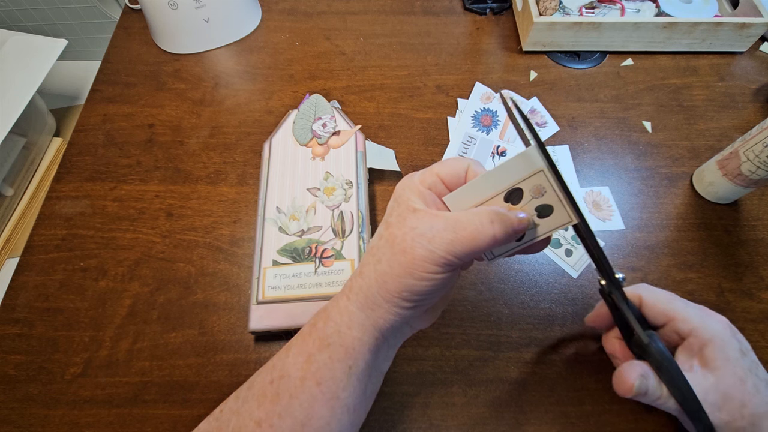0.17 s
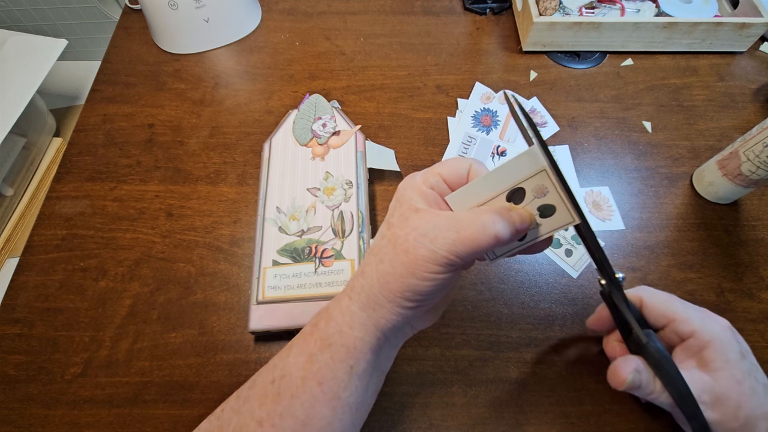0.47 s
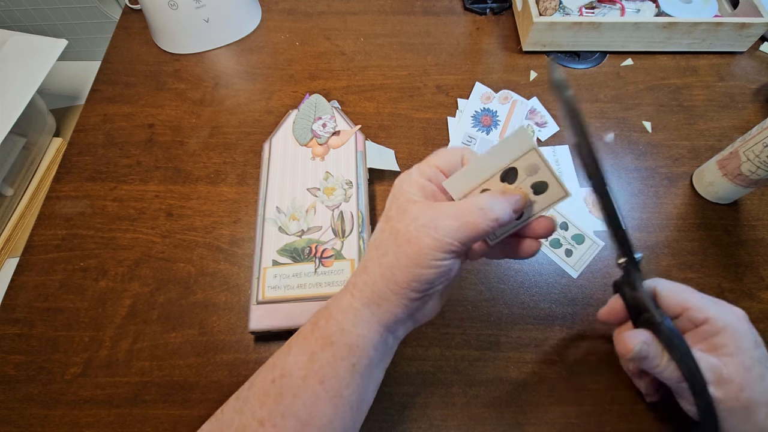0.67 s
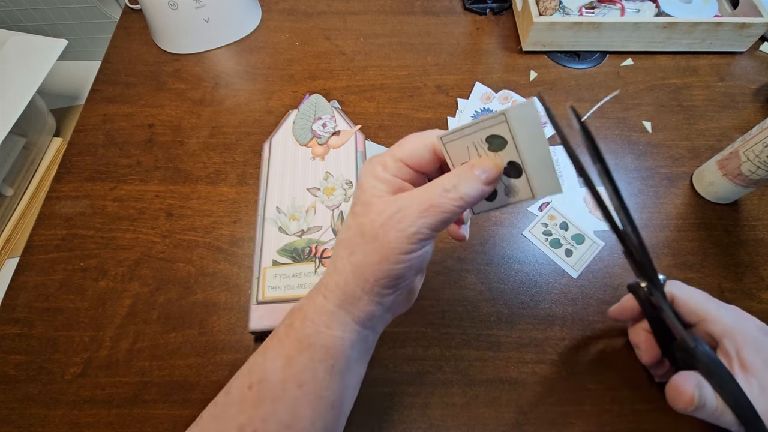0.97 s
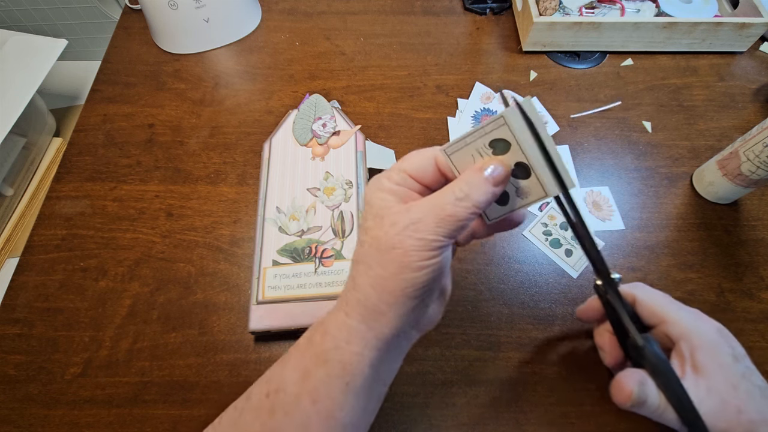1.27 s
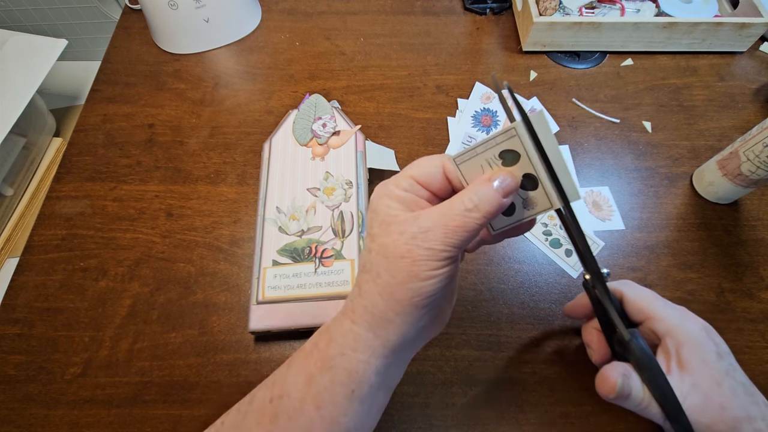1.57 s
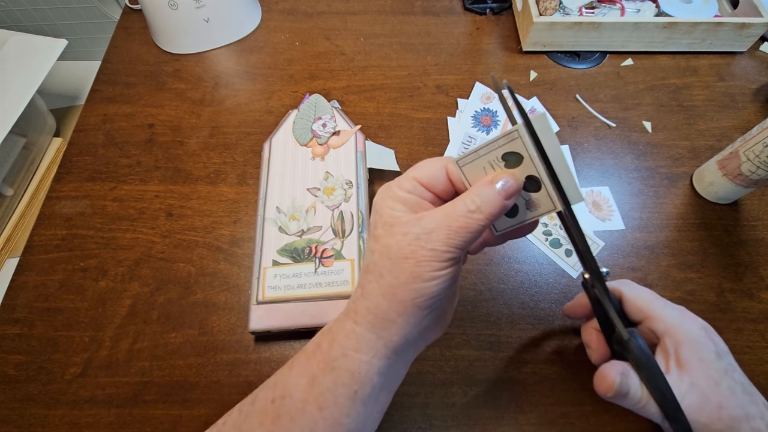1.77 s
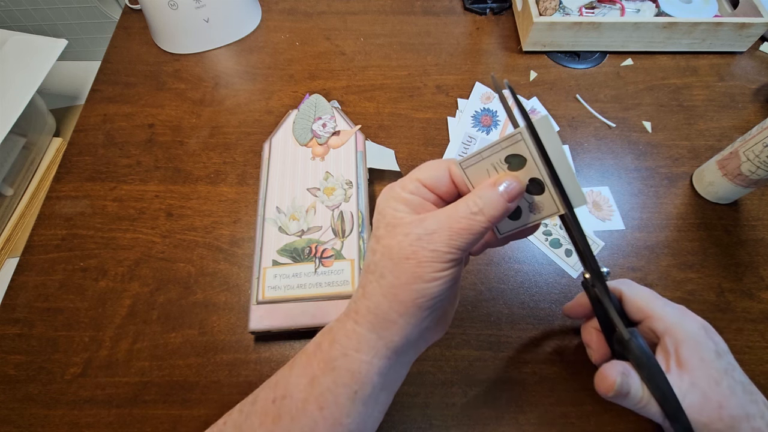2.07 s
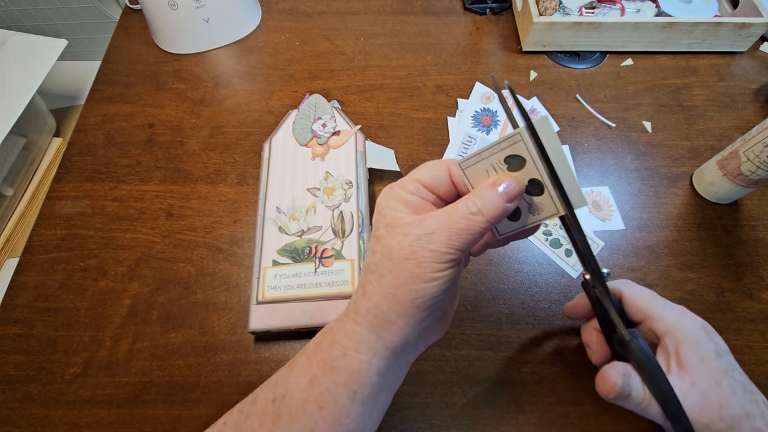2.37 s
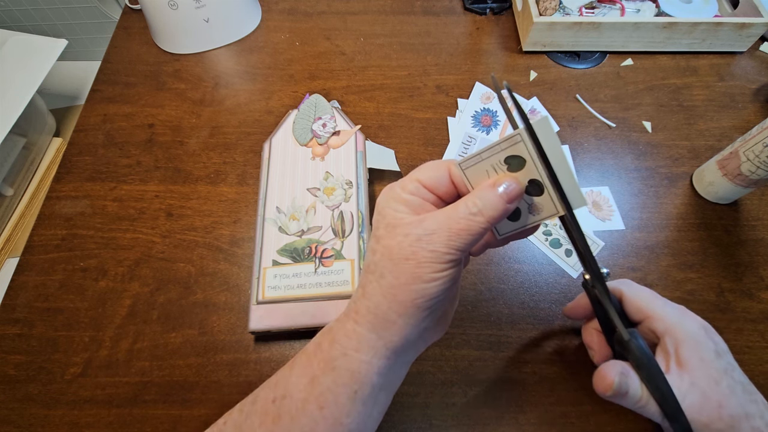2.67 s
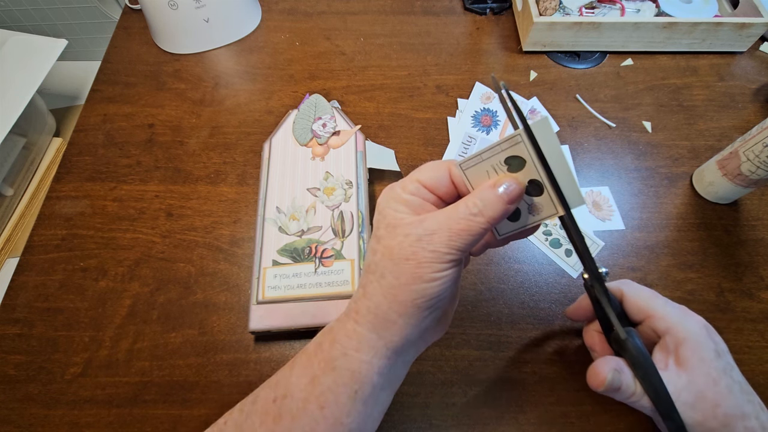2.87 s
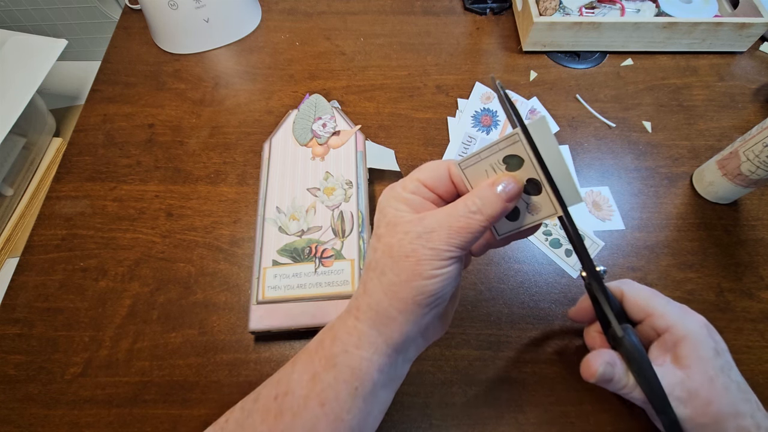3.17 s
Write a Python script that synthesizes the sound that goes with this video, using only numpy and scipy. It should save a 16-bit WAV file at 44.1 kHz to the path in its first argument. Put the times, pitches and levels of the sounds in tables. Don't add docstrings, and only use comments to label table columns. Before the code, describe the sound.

Close stereo pickup of scissors at an indoor desk: crisp tearing cut ending in a snap, steel sliding open, faint ticks and distant thuds, then another finer cut over low building rumble.

```python
import sys
import numpy as np
from scipy import signal
from scipy.fft import rfft, irfft, next_fast_len
from scipy.io import wavfile
from scipy.ndimage import uniform_filter1d

SR = 44100
rng = np.random.default_rng(int(sys.argv[2]) if len(sys.argv) > 2 else 0)


def wav_record(signal):
    frames = np.transpose(np.atleast_2d(signal))
    bounded = np.clip(frames, -1, 1)
    quanta = np.round(bounded * 32767).astype(np.int16)
    wavfile.write(sys.argv[1], SR, quanta)


def ratio(d):
    e = np.asarray(d, float) / 20
    return 10 ** e


N = 145530
TIME = np.arange(N) / SR
TO_LEFT = np.array([[1], [-1]])


def rms_one(x):
    return x / np.sqrt(np.mean(x ** 2) + 1e-30)


def at_hz(points, hz, fall_db=0):
    octave, db = np.log2(np.array(points)[:, 0]), np.array(points)[:, 1]
    h = np.log2(np.maximum(hz, 1))
    outside = np.maximum(octave[0] - h, 0) + np.maximum(h - octave[-1], 0)
    return np.interp(h, octave, db) - fall_db * outside


def colour(pair, spectrum, side, fall_db=12):
    size = next_fast_len(pair.shape[1] + 8192)
    size += size % 2
    hz = np.fft.rfftfreq(size, 1 / SR)
    db = at_hz(spectrum, hz, fall_db)
    db = np.array([db, db + at_hz(side, hz)]) - db.max()
    cepstrum = irfft(np.maximum(db, -140) * np.log(10) / 20, size)
    cepstrum[:, 1:size // 2] *= 2
    cepstrum[:, size // 2 + 1:] = 0
    gain = np.exp(rfft(cepstrum)) / np.sqrt(np.mean(ratio(2 * db[0])))
    mid, diff = irfft(rfft(pair, size) * gain, size)[:, :pair.shape[1]]
    return np.array([mid + diff, mid - diff])


def resonate(x, hz, width_hz):
    r = np.exp(-np.pi * width_hz / SR)
    poles = [1, -2 * r * np.cos(2 * np.pi * hz / SR), r * r]
    return signal.lfilter([1, 0, -1], poles, x + 1e-18) * np.sqrt((1 - r * r) / 2)


def resonate_twice(x, hz, width_hz):
    return resonate(resonate(x, hz, width_hz), hz, width_hz)


def ring(s, hz, db, t60):
    out, i = np.zeros(N), int(s * SR) + 1
    t = np.arange(i, min(N, i + int(2 * t60 * SR))) / SR - s
    out[i:i + len(t)] = ratio(db - 60 * t / t60) * np.sin(2 * np.pi * hz * t)
    return out


def drift(rate_hz):
    r = np.exp(-2 * np.pi * rate_hz / SR)
    return rms_one(signal.lfilter([1], [1, -2 * r, r * r], rng.standard_normal(N + SR))[SR:])


def curve(rows):
    return ratio(np.interp(TIME, *np.transpose(rows)))


# t/s, level/dB
RUMBLE_SWELL = [(0.0, -55), (0.14, -40.5), (0.33, -53), (0.47, -45.5), (0.8, -47), (0.82, -41.5),
                (1.0, -47.5), (1.39, -47), (1.41, -39.5), (1.45, -53), (1.56, -41), (1.6, -51.5),
                (1.7, -39.5), (1.74, -45.5), (2.73, -41.5), (2.76, -58.5), (2.81, -46), (3.3, -47.5)]
# f/Hz, level/dB per Hz
RUMBLE_COLOUR = [(12, -17.5), (30, -5.5), (60, 6), (79, -5), (92, -25.5)]
# f/Hz, level/dB per Hz
AIR_COLOUR = [(92, -13), (179, -14.5), (202, -18), (420, -31), (520, -37.5), (1400, -43), (2000, -50),
              (9000, -68.5)]
# f/Hz, side against mid/dB
AIR_SIDE = [(60, -28), (180, -13), (550, 0.5), (15000, 2)]
# f/Hz, level/dB, width/Hz
HUM = [(119.4, -61.5, 15), (176.33, -64.5, 12), (4430, -99, 140), (8670, -108, 200)]
# f/Hz, level/dB
TONES = [(176.5, -64), (2160, -81.5), (4323, -100)]


def background():
    noise = rng.standard_normal((2, 2, N + SR))
    rumble = rms_one(colour(noise[0], RUMBLE_COLOUR, AIR_SIDE, fall_db=32.5)[:, SR:])
    level = np.sqrt(uniform_filter1d(rumble.mean(0) ** 2, SR // 8) + 0.071)
    rumble = rumble / level * curve(RUMBLE_SWELL)
    air = rms_one(colour(noise[1], AIR_COLOUR, AIR_SIDE, fall_db=36.5)[:, SR:])
    air = air * ratio(-62 + 1.5 * drift(2.6))
    hum = 0
    for hz, db, width in HUM:
        mid, side = resonate_twice(rng.standard_normal((2, N + SR)), hz, width)[:, SR:]
        side = ratio(at_hz(AIR_SIDE, hz)) * rms_one(side)
        hum = hum + ratio(db) * (rms_one(mid) + side * [[1], [-1]])
    whine = sum(ratio(db) * np.sin(2 * np.pi * hz * TIME) for hz, db in TONES)
    return rumble + air + hum + whine


# from t/s, to t/s, level/dB
DRAG = [
    (0, 0.386, -84.5),
    (0.409, 0.593, -69.5),
    (.6, 0.654, -69),
    (2.82, 3.312, -75.5),
]
# f/Hz, level/dB per Hz
TEAR_NEXT = [(530, -34.5), (900, -4.5), (3490, -13), (4230, -6), (4940, -9), (9900, -5.5), (15800, -13.5)]
# f/Hz, side against mid/dB
SLIDE_SIDE = [(950, -10), (3800, -0.5)]


def drag():
    edge_s = 0.018
    on = 0
    for start, end, db in DRAG:
        inside = np.minimum(TIME - start, end - TIME)
        on = on + ratio(db) * np.clip(inside / edge_s + 1, 0, 1) ** 2
    rough = rng.standard_normal((2, N)) * ratio(4.6 * drift(42))
    return colour(rough, TEAR_NEXT, SLIDE_SIDE) * on


SLIP_SAMPLES = 4096


def slip_swell(ms):
    rise_share, fade_share = 0.7, 0.45
    u = np.arange(SLIP_SAMPLES) / SR / (ms / 1000 + 1e-4)
    rise = np.sin(np.pi / 2 * np.clip(u / rise_share, 0, 1)) ** 2
    return rise * np.exp(-np.maximum(u - rise_share, 0) ** 1.29 / fade_share)


def fibre_breaks():
    breaks_per_s, spread_db = 14000, 2
    shape = (2, SLIP_SAMPLES)
    sizes = ratio(spread_db * np.minimum(rng.exponential(1, shape), 4)) * rng.choice([-1, 1], shape)
    return rms_one(sizes * (rng.random(shape) < breaks_per_s / SR))


def blade_ring(breaks, blades):
    luck_db = 5 * rng.normal(0, 1, len(blades))
    modes = [ratio(db + luck) * resonate(breaks, hz, width) for (hz, width, db), luck in zip(blades, luck_db)]
    return sum(modes) / 3


# f/Hz, width/Hz, level/dB
STEEL = [(1590, 25, -10.5), (2064, 60, -1), (2437, 30, -9), (2920, 59, -5), (3506, 64, -5.5),
         (4345, 420, 2.5), (4830, 180, -3.5), (5386, 46, -8), (7366, 160, -6.5), (7790, 149.7, -3.5),
         (8600, 120, 3.5), (11560, 400, -9.5)]
# f/Hz, side against mid/dB
NEAR_SIDE = [(200, -10), (600, -9.5), (2000, -8.5), (9000, 1.5)]


def slips(rows, spectrum, flaps_db, blades=STEEL, blades_db=-8.5):
    slip_db, patch_db = -10, 2.5
    flap_hz, flap_width_hz = 366, 67
    out = np.zeros((2, N + SLIP_SAMPLES))
    for (s, db, card_hz, card_db, ms), flap_db in zip(rows, np.broadcast_to(flaps_db, len(rows))):
        swell = slip_swell(ms)
        breaks = fibre_breaks() * swell
        tearing = breaks + ratio(blades_db) * blade_ring(breaks, blades)
        patchy = [(hz, at_hz(spectrum, hz, 10) + patch_db * rng.normal())
                  for hz in np.geomspace(250, 16000, num=16)]
        bright = 1.605 * rms_one(colour(tearing, patchy, NEAR_SIDE))
        card = ratio(card_db) * rms_one(resonate(breaks[0], card_hz, 28 + card_hz / 12))
        flap = ratio(flap_db) * rms_one(resonate(breaks[0], flap_hz, flap_width_hz))
        i = max(int((s - 0.2 * ms / 1000) * SR), 0)
        out[:, i:i + SLIP_SAMPLES] += ratio(db + slip_db) * (bright + card + flap) * swell.std()
    return out[:, :N] * ratio(TO_LEFT)


# t/s, peak level/dB, card f/Hz, card ring level/dB, length/ms
SLIPS = [
    (0.0034, -52.5, 576, -5.5, 8.1),
    (0.0129, -52.5, 397, 2.5, 13.4),
    (0.072, -42, 1020, -5, 10),
    (.092, -65, 1020, -6, 7.1),
    (0.1345, -51, 4400, -12, 5.5),
    (0.1515, -45.5, 990, -21, 12),
    (0.2255, -40, 1114, -5, 10.4),
    (.243, -60.5, 693, 17.5, 8),
    (0.2558, -42.5, 1290, -17.5, 8),
    (0.2885, -38, 1140, -11.5, 8.4),
]
# f/Hz, level/dB per Hz
TEAR = [(290, -33), (500, -2), (3270, -13), (4300, -7), (8370, -6.5), (10200, -11), (15800, -11.5)]


def first_cut():
    return slips(SLIPS, TEAR, flaps_db=-3.5)


# t/s, peak level/dB, card f/Hz, card ring level/dB, length/ms
HARD_SLIPS = [(.409, -42.5, 377, 3.5, 4.6), (.418, -43.5, 386, -0.5, 7), (.435, -53.5, 1130, 4.5, 6.1),
              (.458, -40, 716, 0.5, 9.1), (.491, -39, 774, 4.5, 15), (.525, -35, 1027, 3.5, 12.2),
              (.545, -33.5, 1590, -6, 14.4), (.565, -36, 2010, -14, 8.8), (.5812, -25, 4730, -7, 3.98),
              (.5855, -30.5, 980, -4, 5.3), (.594, -34.5, 2900, -10, 12)]
# f/Hz, level/dB per Hz
TEAR_HARD = [(240, -40), (400, -8.5), (991, -15.5), (1330, -18), (4910, -18), (10100, -23.5),
             (15800, -20.5)]


def hard_cut():
    return slips(HARD_SLIPS, TEAR_HARD, flaps_db=-9.5)


# f/Hz, level/dB, t60/s
CRACK = [(854, -42, .05), (1020, -38.5, 0.085), (2020, -42, .03), (2840, -36, .015), (4400, -31, 0.0096),
         (5000, -35, .012)]


def snap_shut():
    tips = sum(ring(0.5818, *mode) for mode in CRACK)
    handles = ring(0.582, 227.7, -37, 0.051)
    return tips + handles


# t/s, level/dB
SLIDE = [
    (.69, -77),
    (.705, -56),
    (.735, -60),
    (.79, -50.5),
    (.83, -52.5),
    (.885, -67.5),
    (.93, -52),
    (1.0, -69.5),
    (1.055, -76.5),
]
# f/Hz, level/dB per Hz
SLIDE_COLOUR = [(710, -20.5), (1200, -7), (1570, -13.5), (2150, -4), (2550, -5), (7270, -2), (15800, -4.5)]


def slide():
    rub = rng.standard_normal((2, N)) * ratio(2 * drift(140))
    on = (TIME > SLIDE[0][0]) * ratio(-500 * np.maximum(TIME - SLIDE[-1][0], 0))
    hiss = colour(rub, SLIDE_COLOUR, SLIDE_SIDE, fall_db=-5)
    return hiss * curve(SLIDE) * on * ratio(TO_LEFT)


# t/s, peak level/dB, card f/Hz, card ring level/dB, length/ms
CLICKS = [
    (.740, -42, 6130, 0.5, 14.6),
    (.752, -63, 760, -2, 9),
    (.807, -38.5, 1090, -10.5, 13),
    (.851, -35, 2980, -5.5, 9),
    (.862, -56.5, 790, 10.5, 5.3),
    (.945, -49, 950, -3, 8.9),
]
# f/Hz, level/dB per Hz
CLICK = [(500, -2.5), (1300, -12.5), (3000, -12), (9800, -14), (15800, -9.5)]


def clicks():
    return slips(CLICKS, CLICK, flaps_db=-12)


# f/Hz, level/dB, t60/s
BUMP = [(104.7, -27.5, 0.12), (172.2, -33.5, 0.21), (274, -43.5, 0.11), (369, -52.5, 0.2),
        (520, -47.5, 0.096), (646, -53.5, 0.13)]


def desk_bump():
    start_s, rise_s = 0.806, 0.006
    rise = np.clip((TIME - start_s) / rise_s, 0, 1)
    modes = sum((-1) ** k * ring(start_s, *mode) for k, mode in enumerate(BUMP))
    return -rise * modes


# t/s, peak level/dB, f/Hz, rise/ms
TICKS = [
    (1.033, -77.5, 8370, 10.5),
    (1.14, -89.5, 8660, 24),
    (1.239, -90.5, 8600, 8.8),
    (1.647, -80.5, 3110, 2.95),
    (1.68, -88, 3200, 3.6),
    (1.735, -89, 3210, 16),
    (1.772, -74.5, 14000, 3.6),
    (2.026, -85.5, 4170, 3),
    (2.68, -74.5, 12900, 3),
    (2.689, -68, 14300, 3),
]


def ticks():
    out = 0
    for s, db, hz, ms in TICKS:
        u = np.maximum(TIME - s, 0) / (ms / 1000)
        rustle = resonate_twice(rng.standard_normal((2, N)), hz, 0.45 * hz)
        out = out + ratio(db) * rustle * u * np.exp(1 - u)
    return out


# t/s, f/Hz, level/dB
THUDS = [
    (1.152, 50, -34),
    (1.398, 55, -37),
    (1.691, 55, -41.5),
]


def floor_thuds():
    return -sum(ring(s, hz, db, 0.099) for s, hz, db in THUDS)


# t/s, peak level/dB, card f/Hz, strip flap level/dB, length/ms
NEXT_SLIPS = [(2.782, -64.5, 3400, -12, 4.6), (2.802, -55, 3030, -6, 3.4), (2.8278, -50, 2930, -6.5, 8),
              (2.850, -56, 2980, 2, 4.5), (2.859, -49.5, 3220, -3, 9), (2.8888, -64, 3160, -7, 7.5),
              (2.9142, -43.5, 3160, 2, 8.7), (2.948, -47, 5160, 2, 6.8), (2.9778, -45.5, 5240, -2.5, 9),
              (3.0081, -49, 2730, -4.5, 12), (3.0599, -47.5, 3670, 0, 6.7), (3.084, -44.5, 5100, -8, 14),
              (3.110, -53, 2660, -12, 5.8), (3.136, -54.5, 5100, -17, 4.9), (3.1615, -56, 5000, -19, 6.8),
              (3.175, -51.5, 4900, -5, 4.5), (3.1905, -47, 3930, -13, 6), (3.2159, -51.5, 3800, -14, 11),
              (3.2367, -46, 3560, -14, 11), (3.2463, -42, 3620, -3.5, 7.2), (3.258, -56, 3600, -9, 6),
              (3.2806, -45.5, 1700, -3.5, 16)]
# f/Hz, width/Hz, level/dB
STEEL_NEXT = [(1620, 90, -8.5), (2010, 60, -17), (2870, 78, 2), (3560, 110, 1), (4960, 170, 6.5),
              (5300, 71, -5.5), (6040, 150, -4.5), (6920, 170, -11), (7450, 94, -2), (8070, 150, 2),
              (8740, 160, -8.5)]


def next_cut():
    rows = [(s, db, hz, -7.5, ms) for s, db, hz, _, ms in NEXT_SLIPS]
    flaps_db = [row[3] for row in NEXT_SLIPS]
    return slips(rows, TEAR_NEXT, flaps_db, STEEL_NEXT, blades_db=-6.5)


def room(x):
    t60_s, wall_cut_hz = 0.14, 41000
    size = next_fast_len(N + SR)
    w = 2 * np.pi * np.fft.rfftfreq(size)
    dull = np.exp(-2 * np.pi * wall_cut_hz / SR)
    wall = (1 - dull) / (1 - dull * np.exp(-1j * w))
    out, spectrum = np.zeros((2, N)), rfft(x.mean(0), size)
    for side in range(2):
        echoes = 0
        for k, lag in enumerate((rng.uniform(0.006, 0.025, 6) * SR).astype(int)):
            loop = ratio(-60 * lag / SR / t60_s) * wall * np.exp(-1j * w * lag)
            echoes = echoes + (-1) ** k * loop / (1 - loop)
        out[side] = irfft(spectrum * echoes, size)[:N]
    return out


def scene():
    near = drag() + first_cut() + hard_cut() + slide() + clicks() + ticks() + next_cut()
    knocks = snap_shut() + desk_bump() + floor_thuds()
    return near + ratio(-11.5) * room(near) + knocks + background()


def band_limit(x):
    return signal.sosfilt(signal.butter(12, 15960, fs=SR, output="sos"), x)


# f/Hz, level/dB
MIC_DIP = [(8800, 0.5), (9500, -9), (10600, -10.5), (11400, -2)]


def record(dry):
    low_pass = signal.cheby2(12, 70, 16500, fs=SR, output="sos")
    cut = signal.sosfilt(low_pass, dry)
    hz = np.fft.rfftfreq(N, 1 / SR)
    mix = irfft(rfft(cut) * ratio(at_hz(MIC_DIP, hz)), N)
    return band_limit(mix)


dry = scene()
out = record(dry)
wav_record(out)
```